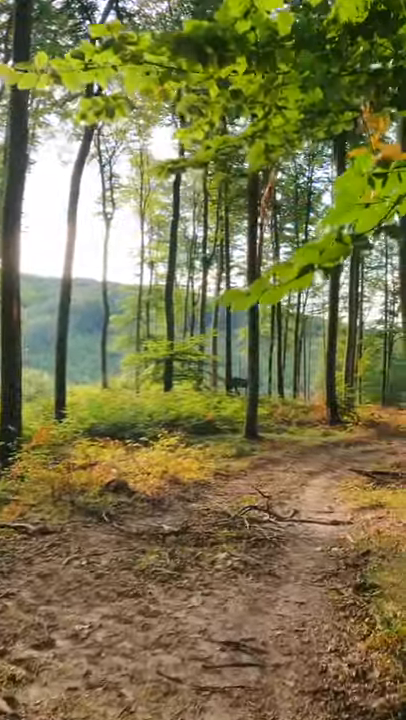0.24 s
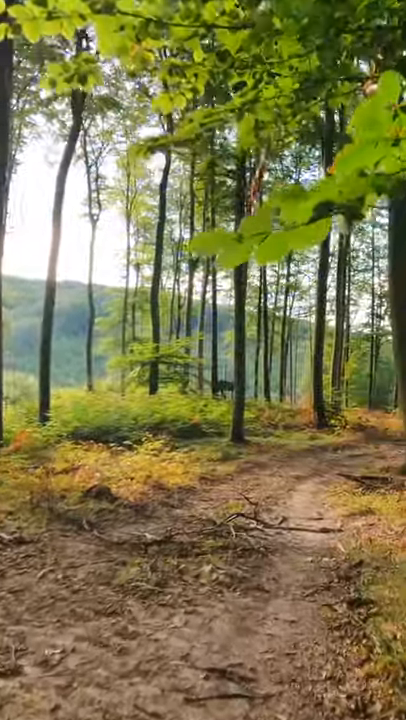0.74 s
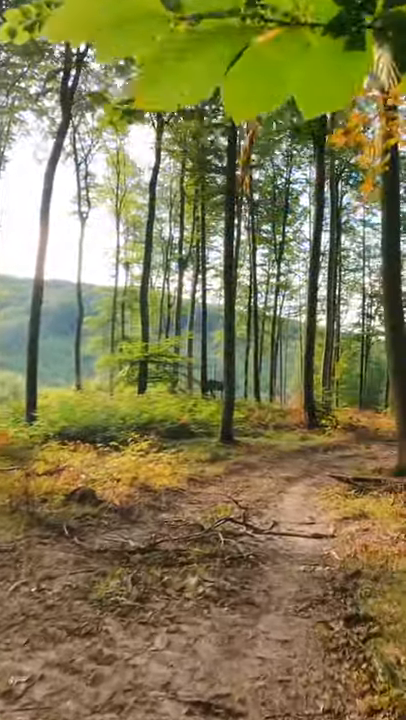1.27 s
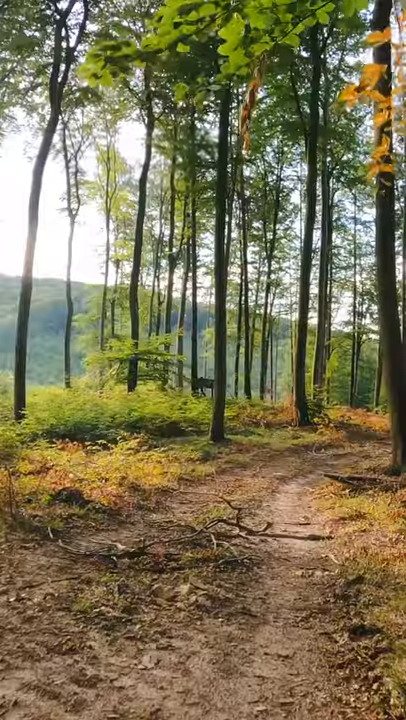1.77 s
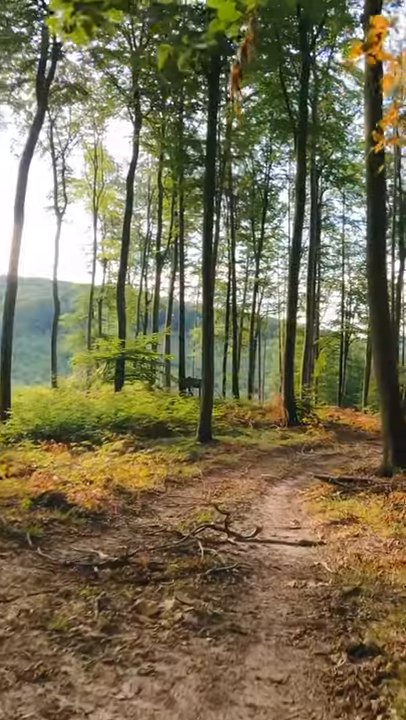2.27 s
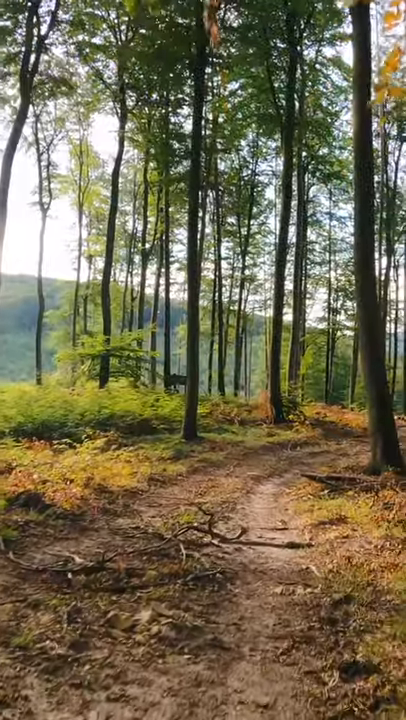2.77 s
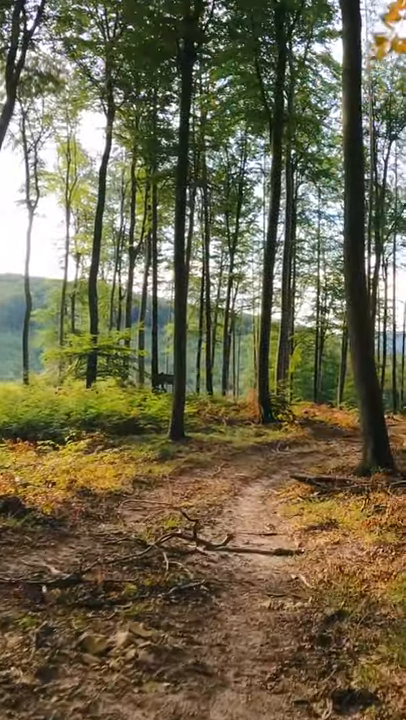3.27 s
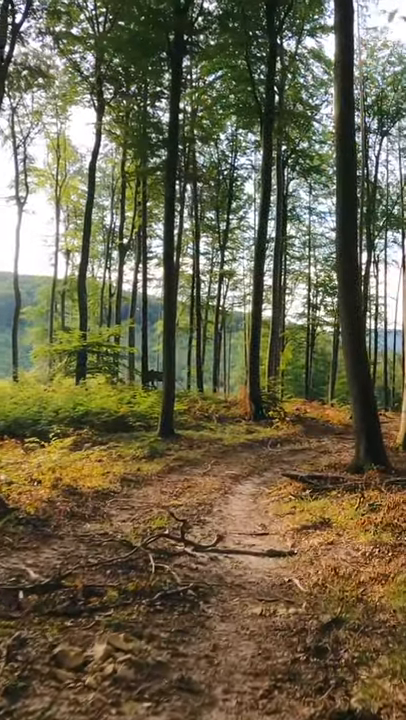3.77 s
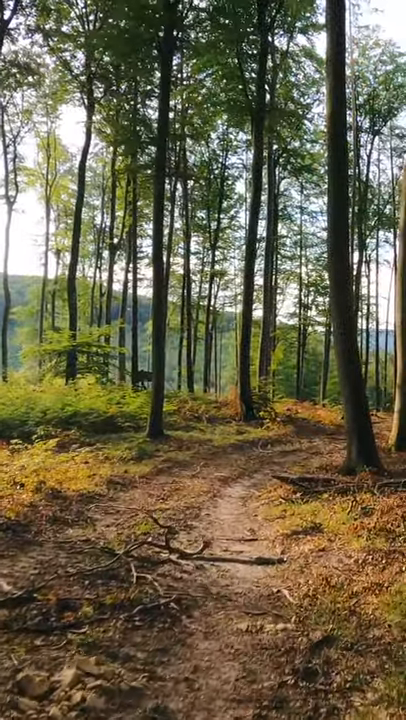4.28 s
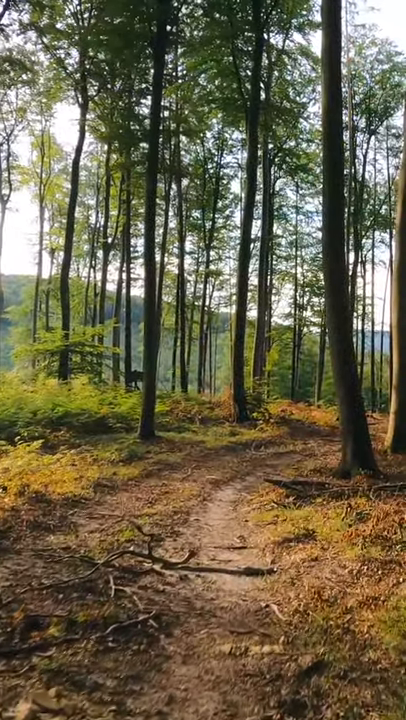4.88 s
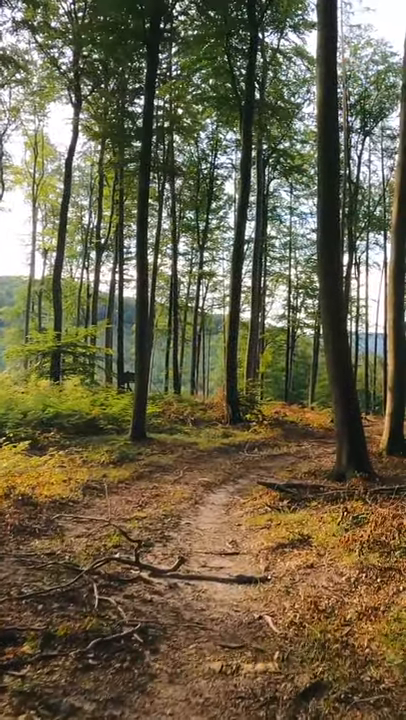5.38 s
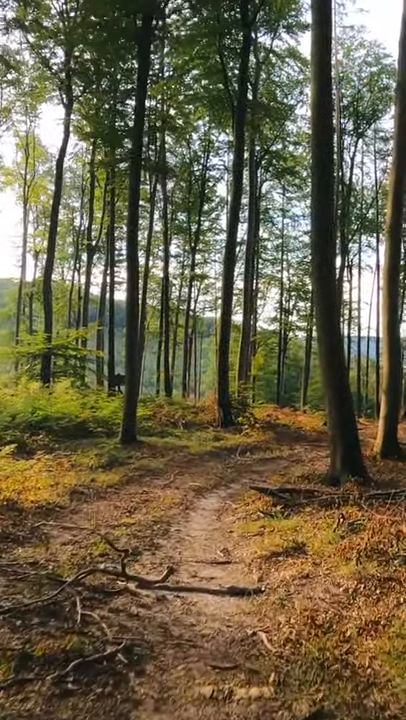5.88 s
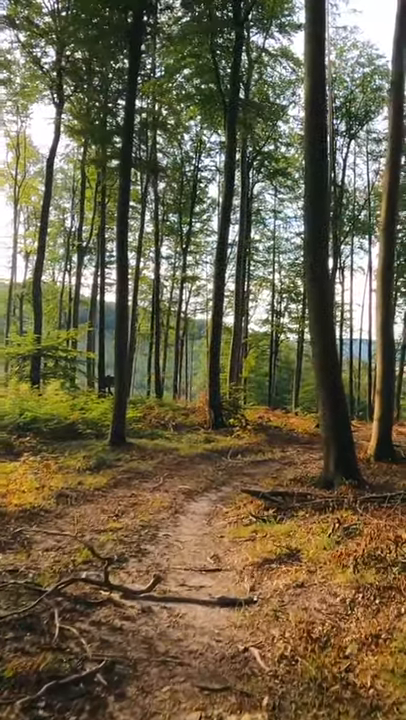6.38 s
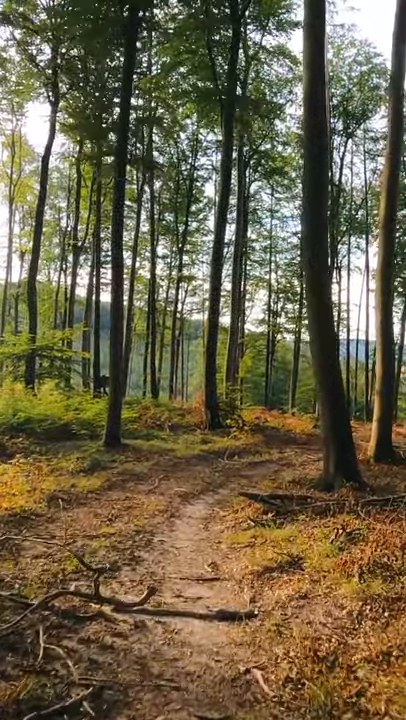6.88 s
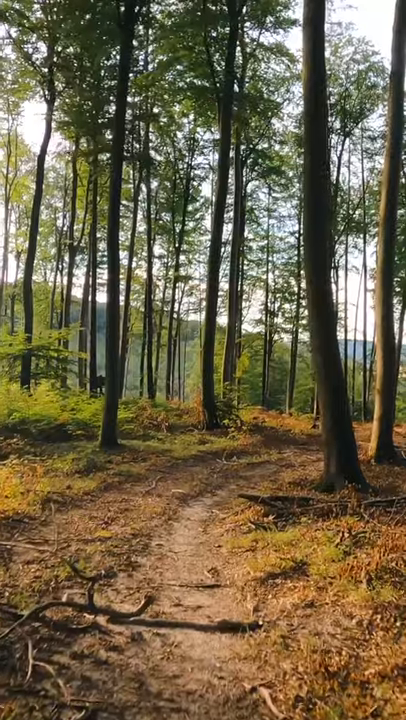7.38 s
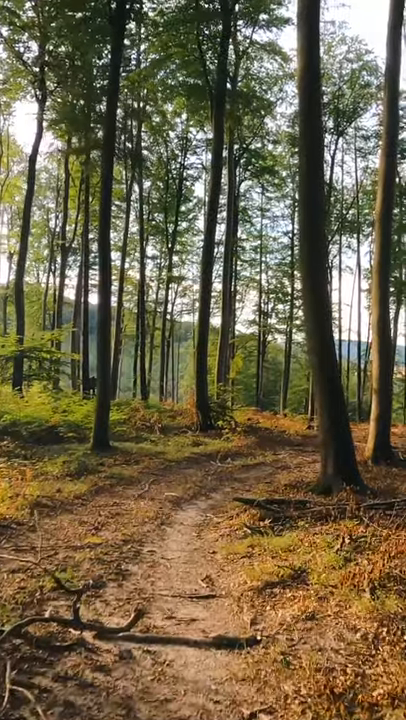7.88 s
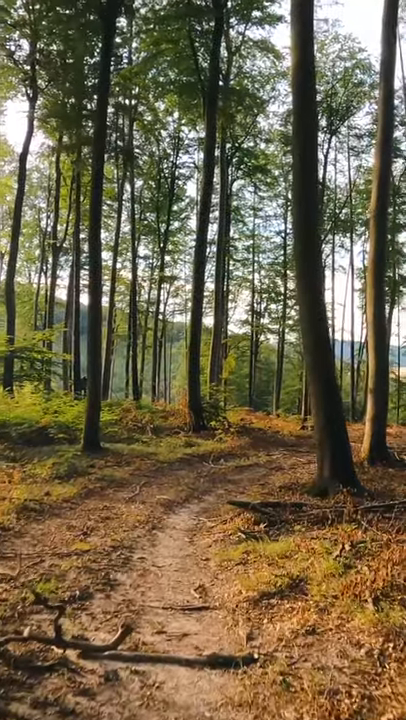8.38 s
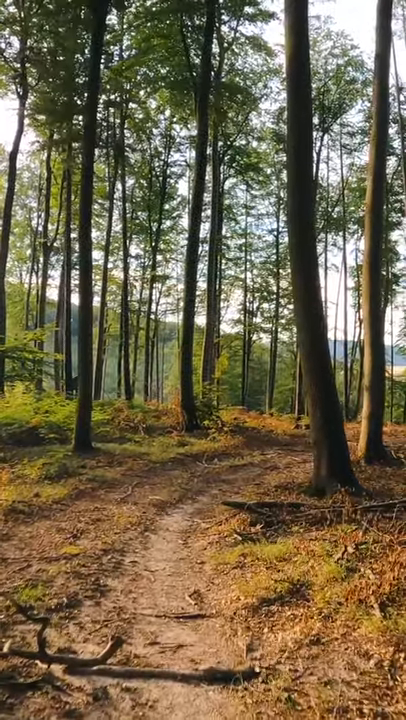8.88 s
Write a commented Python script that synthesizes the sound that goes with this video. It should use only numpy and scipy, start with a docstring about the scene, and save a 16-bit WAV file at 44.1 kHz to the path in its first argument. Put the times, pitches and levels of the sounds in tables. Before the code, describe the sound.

Light wind rumbles on a microphone carried along a forest path, under a steady scatter of birdsong. Fluted whistles, short chirps and fast high trills come first, followed by one bird alternating two notes, then farther calls and a few more whistles at the end. Quiet steps on sticks, stones and dry leaves come now and then, with a faint hush from the treetops.

```python
"""Songbirds in a beech wood.

A blackbird flutes and trills; warblers chirp and one repeats a two-note motif. Notes are gliding sines,
most from one stock of syllables. Farther birds come mostly as echo among the trunks; a wood pigeon coos.
Soft steps on the dirt path knock sticks and stones (noise bursts) and crush leaves (tiny cracks).
Light wind rumbles on the microphone over the hush of the canopy and a blur of distant song."""
import sys
import numpy as np
from scipy import signal
from scipy.fft import rfft, irfft, next_fast_len
from scipy.io import wavfile
from scipy.ndimage import uniform_filter1d, map_coordinates

SR = 44100
rng = np.random.default_rng(int(sys.argv[2]) if len(sys.argv) > 2 else 0)


def wav_out(sig):
    """Save sig, one row per channel (or a flat mono array), as 16-bit PCM at SR to the path in sys.argv[1]."""
    wavfile.write(sys.argv[1], SR, np.round(np.clip(np.atleast_2d(sig).T, -1, 1) * 32767).astype(np.int16))


N = 403074

# shared syllables, by name: start_semitones, end_semitones (from mid pitch), swell_db, slide_semitones
SYLLABLES = {"hold": (0, 0.06, -2.5, 0), "swell": (-0.15, 0.4, 16, 0), "sag": (0.85, -1.1, 2.7, 0),
             "settle": (2, 0.5, 6.5, 0), "fall": (1.6, -2.5, 6.5, 0), "plunge": (8, 1, -13.5, 0),
             "drop": (-0.061, -2.16, 0.96, -0.58), "rise": (-2, 1.26, 2, 0.5), "lift": (-2.5, -0.1, 4, 0),
             "arch": (-0.96, -1.2, 0, 0), "peak": (-3.5, -7, 0, 1.5), "dip": (2.5, 2.5, -1, 0),
             "climb": (-3, 4, 6, -1), "crest": (-.45, -.35, -2, 0.24), "slur": (0.5, 0, 7, 4),
             "flick": (1.3, -0.1, -6, 5), "dive": (3.5, -5, -2.5, 0), "soar": (-2.2, 2.6, 12.5, 1)}
# sung notes: start_s, syllable, length_s, pitch_hz, level_db
BLACKBIRD_WHISTLES = [(.96, "settle", 0.174, 1709, -46.5), (1.48, "arch", 0.046, 1937, -38.5),
                      (1.602, "sag", 0.029, 2307, -39.5), (1.666, "fall", 0.021, 1875, -44),
                      (1.875, "arch", 0.17, 1674, -43), (1.98, "lift", 0.059, 1904, -49),
                      (2.348, "settle", 0.058, 2106, -54.5), (2.478, "sag", 0.092, 2059, -51),
                      (2.575, "sag", 0.058, 1979, -41.5), (2.62, "hold", 0.075, 1890, -48.5),
                      (2.875, "fall", 0.034, 1966, -64.5), (2.95, "rise", 0.062, 2080, -57.5),
                      (8.523, "slur", 0.072, 1620, -55), (8.603, "swell", 0.077, 2200, -48),
                      (8.655, "sag", 0.033, 2146, -54.5), (8.8, "swell", 0.096, 1985, -47),
                      (8.89, "slur", 0.12, 2179, -39)]
BLACKBIRD_CHIRPS = [(1.643, "sag", 0.03, 2330, -33.5), (2.088, "soar", .046, 2635, -34),
                    (3.053, "peak", .039, 2867, -36), (3.107, "peak", 0.039, 2918, -37)]
WARBLER_NOTES = [(0, "hold", 0.032, 3198, -40.5), (.265, "fall", 0.041, 3890, -49),
                 (.358, "fall", 0.025, 3840, -46), (.497, "arch", 0.045, 3270, -45.5),
                 (.668, "settle", 0.022, 3323, -49.5), (.875, "rise", 0.019, 3115, -53),
                 (.897, "hold", 0.047, 3074, -49.5), (.935, "fall", 0.019, 2930, -50.5),
                 (1.317, "crest", 0.12, 3937, -57.5), (1.14, "lift", 0.11, 2850, -48),
                 (1.463, "sag", 0.09, 3275, -45), (1.653, "drop", 0.029, 3120, -42),
                 (1.81, "hold", 0.04, 4210, -52.5), (1.836, "fall", 0.021, 3680, -44.5),
                 (1.853, "crest", 0.066, 3223, -40), (1.848, "rise", 0.037, 2610, -45),
                 (3.265, "sag", 0.098, 3806, -47.5), (3.365, "sag", 0.022, 2920, -47),
                 (3.405, "settle", 0.018, 2550, -45), (3.433, "drop", 0.029, 2623, -42.5),
                 (3.772, "fall", 0.019, 4325, -42), (3.783, "hold", 0.084, 3990, -44),
                 (3.897, "arch", 0.048, 3800, -41), (3.955, "hold", 0.058, 3420, -48),
                 (4, "hold", 0.05, 4010, -57), (4.325, "lift", 0.083, 3207, -54.5),
                 (4.368, "sag", 0.012, 2920, -48.5), (4.56, "lift", 0.05, 2630, -50.5),
                 (4.6, "crest", 0.1, 2750, -43.5), (4.748, "sag", 0.018, 2800, -43),
                 (4.8, "slur", 0.051, 3715, -48), (4.965, "hold", 0.043, 3150, -42.5),
                 (5.352, "hold", 0.021, 3272, -42), (7.545, "hold", .21, 4515, -54.5),
                 (7.58, "hold", .2, 4210, -53), (7.62, "sag", 0.069, 4670, -52.5),
                 (8.22, "hold", 0.11, 2925, -54.5), (8.445, "hold", .06, 3170, -49),
                 (8.6, "slur", 0.12, 3228, -45.5), (8.63, "hold", 0.072, 2776, -52.5)]
TWITTER_NOTES = [(4.964, "climb", 0.013, 4750, -49), (4.979, "dip", .027, 4900, -45),
                 (5.016, "fall", 0.017, 4500, -45), (5.198, "flick", 0.047, 5160, -50.5),
                 (5.366, "flick", .036, 5320, -57)]
CHIP_NOTES = [(1.092, "fall", 0.025, 5050, -58.5), (1.428, "fall", 0.039, 4990, -57.5),
              (3.074, "peak", 0.013, 4600, -52), (3.165, "peak", 0.009, 4720, -56),
              (3.598, "flick", 0.046, 7020, -63), (4.09, "fall", 0.014, 6730, -61.5),
              (4.522, "dive", 0.016, 5060, -54), (4.815, "dive", 0.015, 6430, -61),
              (7.55, "fall", 0.03, 3930, -51)]
TREETOP_NOTES = [(.1, "crest", 0.077, 5100, -67), (3.3, "hold", 0.078, 6630, -73),
                 (3.67, "hold", 0.031, 5130, -62.5), (4.15, "hold", 0.23, 6920, -77.5),
                 (4.42, "arch", 0.069, 8400, -80), (6.015, "crest", 0.071, 6930, -67.5),
                 (6.1, "crest", 0.35, 7340, -75.5), (6.22, "hold", 0.12, 6880, -76.5),
                 (7, "sag", 0.082, 7000, -70.5), (7.1, "crest", 0.22, 7770, -83),
                 (7.3, "sag", 0.14, 8140, -83), (7.49, "plunge", 0.087, 5270, -72.5),
                 (8.03, "fall", 0.073, 6550, -75.5)]
FAR_NOTES = [(0, "fall", 0.047, 3434, -52.5), (1.7, "hold", 0.027, 2695, -41.5),
             (1.8, "hold", 0.048, 4350, -48.5), (2.512, "drop", 0.043, 2824, -56.5),
             (2.77, "lift", 0.025, 3353, -49), (3.72, "rise", 0.046, 3450, -50.5),
             (4.25, "lift", 0.073, 3420, -58.5), (4.44, "rise", 0.035, 3200, -60),
             (4.95, "sag", 0.065, 4210, -57.5), (6.88, "sag", 0.038, 4320, -52),
             (6.91, "hold", 0.1, 3197, -55.5), (7, "sag", 0.11, 3780, -62), (7.12, "sag", 0.099, 4410, -59),
             (7.332, "hold", 0.034, 3480, -46), (7.475, "fall", 0.033, 3190, -50.5),
             (7.535, "hold", 0.085, 4380, -47.5), (7.55, "fall", 0.047, 3520, -49.5),
             (7.74, "hold", 0.11, 2804, -52), (8.04, "hold", 0.11, 3150, -50),
             (8.08, "fall", 0.03, 3490, -49.5), (8.15, "sag", .04, 4360, -60.5),
             (8.28, "fall", 0.033, 3600, -43.5), (8.33, "hold", 0.031, 3300, -50),
             (8.405, "settle", 0.029, 3345, -41.5), (8.51, "fall", .04, 3410, -48),
             (8.63, "hold", 0.078, 2947, -48), (8.8, "sag", 0.038, 4000, -52),
             (8.83, "rise", 0.067, 3506, -46.5), (8.86, "fall", 0.058, 3040, -51),
             (8.9, "sag", 0.077, 2443, -48)]
# warblers shift as the walker turns: time_s, left_minus_right_db
WARBLER_PAN = [(0, 7.5), (1.6, 5), (3.3, 1.5), (5.3, 3.5)]
# the motif's two syllables: offset_s, pitch_hz, level_db
HOOK_CONTOUR = [(0, 3950, -24), (.009, 4150, -13), (.018, 4290, 0), (.029, 4230, -1), (.037, 3700, -1),
                (.045, 3380, -5), (.054, 3260, -16), (.068, 3250, -4), (.098, 3250, -3), (.112, 3240, -18)]
SCOOP_CONTOUR = [(0, 3350, -12), (.005, 3050, 0), (.014, 2750, 0), (.026, 2670, -3), (.038, 2770, -2),
                 (.05, 2880, 0), (.06, 2870, -1), (.068, 2850, -12)]
# their repeats: start_s, level_db, closing_gain_db
HOOK_REPEATS = [(5.262, -40.5, -5), (5.585, -35.5, -3.5), (5.926, -37, -4), (6.266, -38, 3),
                (6.647, -40, 3.5)]
SCOOP_REPEATS = [(5.121, -39, 0.49), (5.454, -42, 2.4), (5.78, -39.5, 1), (6.124, -38.5, 1.5),
                 (6.485, -40, 1.2)]
# trills: start_s, length_s, start_hz, mid_hz, end_hz, level_db, swell_db, sweeps_per_s, depth_hz
TRILLS = [(1.267, 0.059, 1528, 1716, 1855, -43, 11.5, 72, 133),
          (1.315, .16, 1980, 2282, 2056, -41, -0.5, 39.8, 402),
          (2.721, .016, 4500, 4370, 4200, -53.5, 0, 166, 450),
          (2.758, 0.038, 5680, 6050, 5670, -43, 17.5, 56, 890),
          (2.814, 0.033, 5580, 5140, 5180, -40, -10, 112, 643),
          (2.909, 0.039, 6400, 6450, 5660, -48, 27, 52, 760),
          (2.96, 0.036, 5460, 5410, 5370, -41.5, -13, 147, 606),
          (3.324, 0.094, 4034, 4027, 3964, -47.5, -5, 87, 424),
          (4.141, 0.101, 2640, 2902, 2720, -45.5, 9, 170, 127.6),
          (4.904, 0.049, 5800, 5395, 5280, -47, 4, 310, 152),
          (5.092, 0.039, 4380, 4130, 4600, -46.5, 0.5, 82, 270),
          (5.149, 0.018, 4570, 4520, 4300, -49.5, 5.5, 80, 350),
          (5.269, 0.041, 4400, 4440, 4730, -40, -9, 300, 172)]
# coos of the pigeon's phrase: offset_s, length_s, start_hz, mid_hz, end_hz, level_db
COO_NOTES = [(0, 0.065, 428, 460, 567, -73.5), (0.521, 0.39, 562.5, 502.6, 401, -69),
             (1.242, 0.055, 406, 438, 532, -71.5), (1.36, 0.17, 538, 457.5, 382, -67.5),
             (1.632, .25, 457, 431, 380, -64), (2.268, 0.11, 492, 531, 577, -75.5)]
# its repeats: start_s, gain_db, growth_db_per_s
COO_REPEATS = [(.07, -6, 2.5), (2.74, -3, -5), (5.45, -1.5, -1), (8.18, -2, -6)]
# sticks and stones giving underfoot: start_s, level_db, thud_gain_db, snap_gain_db
STEPS = [(0.38, -48.5, -3.5, -20), (0.943, -46, -15, -45), (1.057, -71, -8, 0.5), (1.475, -43.5, -16, -36),
         (1.493, -45.5, -2.5, -45.5), (1.847, -48, -13, -30), (1.867, -37, -23, -34.5),
         (1.875, -40.5, -23, -36), (1.909, -43.5, -19, -30), (1.965, -46, -23, -36),
         (2.01, -47, -22, -37.5), (3.02, -47, -1, -30), (3.118, -43, -4, -25), (3.601, -46, -10, -34),
         (3.614, -49.5, -6, -34), (5.744, -44.5, -20, -28.5), (6.72, -48.5, -25, -32),
         (6.765, -43.5, -19, -46), (6.778, -59, -13, -44), (6.792, -39.5, -30, -55), (6.81, -67, -10, -45),
         (7.269, -45, -8, -41), (7.664, -51, -11.5, -51), (7.85, -49, 5.5, -51), (7.869, -53, -5, -49),
         (8.402, -48, -3, -33)]
# dry leaves crushed: start_s, length_s, level_db
CRUNCHES = [(0.358, 0.15, -80), (1.284, 0.22, -85), (1.44, 0.074, -82), (1.621, .05, -77),
            (1.842, 0.084, -73), (3.64, 0.09, -78.5), (3.76, .03, -71.5), (3.963, .11, -73.5),
            (5.955, 0.078, -75), (7.305, 0.089, -83), (7.975, .03, -74.5), (8.255, 0.15, -80)]
# footstep spectra: freq_hz, gain_db
SCUFF_SPECTRUM = [(200, -26), (500, -7), (800, -6.5), (1300, -3.5), (1800, -6), (2500, -14.5), (5000, -19),
                  (9000, -57.5)]
THUD_SPECTRUM = [(40, -17.5), (170, 4), (320, 0.5), (600, -6), (1500, -63.5)]
SNAP_SPECTRUM = [(800, -12.5), (3000, -1.5), (7000, 5.5), (11500, -21), (13000, -23.5)]
LEAF_SPECTRUM = [(1500, -13), (4000, 5), (7500, 10), (9500, -4), (11800, -13), (13000, -34)]
# background envelopes: time_s, level_db
WIND_LEVEL = [(0.0, -51.5), (0.1, -58.5), (0.41, -43.5), (0.46, -57.5), (1.78, -53), (1.86, -67),
              (2.16, -55.5), (2.24, -70), (2.34, -50), (2.52, -63), (2.82, -51), (2.87, -64), (3.05, -50),
              (3.16, -64), (3.31, -41.5), (3.36, -55), (3.71, -62.5), (3.74, -56.5), (5.55, -57.5),
              (5.58, -50.5), (5.96, -57), (6.34, -52.5), (6.39, -41.5), (6.46, -56.5), (6.72, -48),
              (7.13, -61), (7.25, -54), (7.84, -58.5), (7.89, -65), (8.47, -52.5), (8.81, -64), (9.14, -50)]
CHORUS_LEVEL = [(0.0, -53.5), (0.94, -96), (1.42, -61.5), (2.04, -54), (2.52, -75), (3.33, -55.5),
                (3.64, -57.5), (3.97, -54), (4.58, -79), (4.81, -45), (5.5, -44.5), (6.59, -50.5),
                (7.28, -57), (7.64, -51), (8.02, -68), (8.35, -47.5), (8.73, -73), (9.14, -57)]
HIGH_TWITTER_LEVEL = [(0.0, -88.5), (4.4, -83.5), (5.09, -89), (5.98, -82.5), (6.19, -90), (6.49, -87.5),
                      (7.36, -83), (7.61, -98), (8.53, -82), (9.14, -92.5)]
# background spectra: freq_hz, gain_db
RUMBLE_SPECTRUM = [(15, -7.5), (30, -4.5), (62, 6.5), (90, -4), (130, -11.5), (220, -38.5), (400, -48.5),
                   (900, -81.5)]
EDDY_SPECTRUM = [(15, 8), (30, 1.5), (60, -17), (120, -25), (300, -67.5)]
CANOPY_SPECTRUM = [(100, 1.5), (200, -0.5), (330, -6.5), (700, -11), (1050, -5), (1500, -8.5),
                   (2200, -10.5), (4000, -17), (6000, -23.5), (8000, -33), (10000, -47), (11800, -52),
                   (12500, -50.5)]
CHORUS_SPECTRUM = [(2200, -31), (2650, 0.5), (3150, 6.5), (4200, -5.5), (4800, -11.5), (6000, -54)]
HIGH_TWITTER_SPECTRUM = [(4500, -15), (6000, -5.5), (7300, 0.5), (8200, -8), (9500, -20.5), (12000, -38.5)]
# echo decay of the far trunks: freq_hz, t60_s
FOREST_T60 = [(300, .7), (1700, .56), (2400, .7), (3200, .88), (5000, .85), (8000, .65)]


def blackbird(pan_db=-1.5):
    """Fluted whistles and loud, soft-edged closing chirps."""
    whistles = pan(sing(BLACKBIRD_WHISTLES, taper=0.21, waver=0.005, waver_per_s=200), pan_db)
    chirps = pan(sing(BLACKBIRD_CHIRPS, taper=0.61, waver=0.0067, waver_per_s=180), pan_db)
    return (forest(whistles, direct_db=3, echo_db=1.3, lag_us=62, side_db=-8.5, bloom_s=0.021)
            + forest(chirps, direct_db=0.5, echo_db=-3.5, lag_us=65, side_db=-7, bloom_s=0.0082))


def warblers():
    """Short chirps, and one bird alternating two syllables."""
    chirps = sing(WARBLER_NOTES, taper=0.15, waver=0.0094, waver_per_s=209)
    chirps = pan(chirps, over_time(WARBLER_PAN))
    motif = repeat_syllable(HOOK_CONTOUR, HOOK_REPEATS) + repeat_syllable(SCOOP_CONTOUR, SCOOP_REPEATS)
    motif = pan(motif, pan_db=3)
    return (forest(chirps, direct_db=0.5, echo_db=-2.5, lag_us=52, side_db=-2.5, bloom_s=0.019)
            + forest(motif, direct_db=-0.96, echo_db=-5, lag_us=32, side_db=-6, bloom_s=0.02))


def sing(notes, taper, waver, waver_per_s, slide_share=0.13):
    """Stock syllables, each stretched to its length and moved to its pitch."""
    song = np.zeros(N)
    for start_s, syllable, length_s, pitch_hz, level_db in notes:
        start_semitones, end_semitones, swell_db, slide_semitones = SYLLABLES[syllable]
        semitones = arc(length_s, start_semitones, 0, end_semitones)
        semitones -= slide_semitones * np.exp(-np.linspace(0, 1, len(semitones)) / slide_share)
        note = whistle(pitch_hz * 2 ** (semitones / 12), swell_db, taper, waver, waver_per_s)
        add(song, start_s, amp(level_db) * note)
    return song


def whistle(pitch_hz, swell_db, taper, waver, waver_per_s, attack_s=0.0024, flutter_db=1.5):
    """One unsteady note of rms 1; waver is a fraction of the pitch."""
    n = len(pitch_hz)
    envelope = signal.windows.tukey(n, taper) * (1 - np.exp(-np.arange(n) / SR / attack_s))
    level_db = swell_db * np.linspace(-0.5, 0.5, n) + flutter_db * wobble(waver_per_s, n)
    unsteady_hz = pitch_hz * (1 + waver * wobble(waver_per_s, n))
    return unit_rms(envelope * amp(level_db) * tone(unsteady_hz))


def repeat_syllable(contour, repeats):
    """A learnt syllable, slightly detuned each time, its close stronger or weaker."""
    song = np.zeros(N)
    offset_s, contour_hz, contour_db = np.transpose(contour)
    t = np.arange(int(offset_s[-1] * SR)) / SR
    pitch_hz = uniform_filter1d(np.interp(t, offset_s, contour_hz), size=300)
    envelope = np.sqrt(2) * amp(np.interp(t, offset_s, contour_db)) * signal.windows.tukey(len(t), 0.1)
    closing = np.interp(t / offset_s[-1], [0.45, 0.55], [0, 1])
    for start_s, level_db, closing_db in repeats:
        detune = 1 + 0.0039 * rng.standard_normal()
        add(song, start_s, amp(level_db + closing_db * closing) * envelope * tone(pitch_hz * detune))
    return song


def trills(uneven_rad=0.25, accent_db=4, top_loss_db=2):
    """Fast pitch sweeps, loudest on the rise, with a faint octave above."""
    song = np.zeros(N)
    for start_s, length_s, start_hz, mid_hz, end_hz, level_db, swell_db, sweeps_per_s, depth_hz in TRILLS:
        centre_hz = arc(length_s, start_hz, mid_hz, end_hz)
        n = len(centre_hz)
        phase = 2 * np.pi * sweeps_per_s * np.arange(n) / SR + uneven_rad * wobble(sweeps_per_s, n)
        height = np.abs((1 + signal.sawtooth(phase, 0.54)) / 2) ** 1.6  # round troughs, pointed peaks
        pulse = amp(accent_db * np.sin(phase) - top_loss_db * height)
        pitch_hz = centre_hz + depth_hz * (2.2 * height - 1)
        sweeps = whistle(pitch_hz, swell_db, taper=0.28, waver=0.008, waver_per_s=400)
        sweeps *= 1 + amp(-32) * tone(pitch_hz)  # adds the octave
        add(song, start_s, amp(level_db) * unit_rms(pulse * sweeps))
    return forest(song, direct_db=0.47, echo_db=-2, lag_us=50, side_db=-6.5, bloom_s=0.007)


def small_birds():
    """A quick twitter, sharp falling chips and thin notes from the treetops."""
    twitter = sing(TWITTER_NOTES, taper=0.15, waver=0.004, waver_per_s=220)
    chips = sing(CHIP_NOTES, taper=0.3, waver=0.026, waver_per_s=680)
    treetops = sing(TREETOP_NOTES, taper=0.7, waver=0.011, waver_per_s=110)
    return (forest(twitter, direct_db=-1.5, echo_db=-9.5, lag_us=35, side_db=-2, bloom_s=0.014)
            + forest(chips, direct_db=0, echo_db=5.5, lag_us=39, side_db=-1, bloom_s=0.0083)
            + forest(treetops, direct_db=-1, echo_db=4.5, lag_us=45, side_db=-10, bloom_s=0.0068))


def far_birds(chatter_count=18, chatter_hz=3575, chatter_s=0.041, chatter_db=-64):
    """Birds deep in the wood and faint random chatter: blurred in pitch, mostly echo."""
    names = list(SYLLABLES)
    chatter = []
    for when, which, stretch, height in rng.random((chatter_count, 4)):
        syllable = names[int(which * len(names))]
        pitch_hz = chatter_hz * np.exp(0.14 * (2 * height - 1))
        chatter.append((when * N / SR, syllable, chatter_s * (0.5 + stretch), pitch_hz, chatter_db))
    song = sing(FAR_NOTES + chatter, taper=0.091, waver=0.028, waver_per_s=400)
    return forest(song, direct_db=-11, echo_db=3, lag_us=66, side_db=-11, bloom_s=0.025)


def pigeon():
    """One low phrase, repeated; a strong pitch waver makes it husky."""
    song = np.zeros(N)
    for start_s, gain_db, growth_db_per_s in COO_REPEATS:
        for offset_s, length_s, start_hz, mid_hz, end_hz, level_db in COO_NOTES:
            pitch_hz = arc(length_s, start_hz, mid_hz, end_hz)
            coo = whistle(pitch_hz, swell_db=8.5, taper=0.34, waver=0.047, waver_per_s=130)
            add(song, start_s + offset_s, amp(level_db + gain_db + growth_db_per_s * offset_s) * coo)
    return forest(song, direct_db=4.5, echo_db=5.5, lag_us=77, side_db=-9.5, bloom_s=0.0093)


def footsteps(attack_s=0.003, grit_db=-16.5):
    """Sticks and stones give under soft soles: a knock with trickling grit, a thud, a twig snap."""
    scuff, thud, snap = np.zeros((3, N))
    t = np.arange(SR // 4) / SR

    def burst(t60_s):
        return amp(-60 * t / t60_s) * (1 - np.exp(-t / attack_s))

    for start_s, level_db, thud_db, snap_db in STEPS:
        jerks = unit_rms(amp(6 * wobble(400, len(t))))  # the ground settles unevenly
        grit = amp(grit_db) * jerks * burst(t60_s=0.14)
        add(scuff, start_s, amp(level_db + 4.5) * (burst(t60_s=0.017) + grit))
        add(thud, start_s, amp(level_db + thud_db + 6.5) * burst(t60_s=0.03))
        add(snap, start_s, amp(level_db + snap_db + 13.5) * burst(t60_s=0.033))
    layers = (scuff, SCUFF_SPECTRUM), (thud, THUD_SPECTRUM), (snap, SNAP_SPECTRUM)
    return sum(envelope * noise(spectrum, side_db=-13, patchy_db=1.5) for envelope, spectrum in layers)


def leaves(cracks_per_s=5000, spread_db=3, surge_db=3, surges_per_s=70):
    """Leaf litter crumples in a dense, surging shower of tiny cracks."""
    crunches = np.zeros((2, N))
    for start_s, length_s, level_db in CRUNCHES:
        n = int(length_s * SR)
        cracks = (rng.random(n) < cracks_per_s / SR) * rng.standard_normal((2, n))
        cracks *= amp(spread_db * rng.standard_normal(n))
        surge = amp(surge_db * wobble(surges_per_s, n)) * signal.windows.tukey(n, 0.5)
        add(crunches, start_s, amp(level_db + 4.5) * unit_rms(cracks * surge))
    return filtered(crunches, lambda hz: amp(over_freq(LEAF_SPECTRUM, hz)))


def wind(buffet_db=2.06, buffets_per_s=14):
    """Wind buffets the microphone: a shared rumble plus each port's own eddies."""
    rumble = noise(RUMBLE_SPECTRUM, side_db=-13, patchy_db=1)
    eddies = amp(-4) * noise(EDDY_SPECTRUM, side_db=0, patchy_db=1)
    level_db = over_time(WIND_LEVEL) + 0.5 + buffet_db * wobble(buffets_per_s, N)
    return pan(amp(level_db) * (rumble + eddies), pan_db=1)


def chorus():
    """Countless distant birds blur into two bands of noise."""
    song = noise(CHORUS_SPECTRUM, side_db=-3.5, patchy_db=7.5)
    twitter = noise(HIGH_TWITTER_SPECTRUM, side_db=4, patchy_db=-0.5)
    return amp(over_time(CHORUS_LEVEL) - 6) * song + amp(over_time(HIGH_TWITTER_LEVEL) + 4.5) * twitter


def canopy():
    """Broad hush of the treetops."""
    return amp(-63) * noise(CANOPY_SPECTRUM, side_db=-7, patchy_db=4)


def forest(voice, direct_db, echo_db, lag_us, side_db, bloom_s):
    """Direct sound plus trunk echo whose paths change as the microphone moves; left lags right."""
    voice = voice * np.ones((2, 1))
    echo = np.zeros((2, N))
    mono, hop = voice.mean(0), SR // 2
    for centre in range(0, N, hop):
        is_last = centre + hop >= N
        crossfade = np.interp(np.arange(N), [centre - hop, centre, centre + hop], [0, 1, float(is_last)])
        first = max(0, centre - hop)
        segment = (mono * crossfade)[None, first:centre + hop]
        add(echo, first / SR, signal.fftconvolve(segment, trunk_response(side_db, bloom_s), axes=1))
    mix = amp(direct_db) * voice + amp(echo_db) * echo
    delay_s = np.array([[0.5], [-0.5]]) * lag_us / 1e6
    return filtered(mix, lambda hz: np.exp(-2j * np.pi * hz * delay_s))


def trunk_response(side_db, bloom_s, near_t60_s=0.13):
    """Far and near trunks scatter an impulse into a tail that builds over bloom_s."""
    hz, t, spectra = signal.stft(rng.standard_normal((2, SR)), SR, nperseg=256)
    decay = amp(-60 * t / over_freq(FOREST_T60, hz)[:, None]) + 3.8 * amp(-60 * t / near_t60_s)
    single_trunks = amp(3 * rng.standard_normal(len(t)))
    build_up = 1 - np.exp(-t / bloom_s)
    mid, side = signal.istft(spectra * decay * single_trunks * build_up, SR, nperseg=256)[1]
    return unit_stereo(mid, side, side_db) / np.sqrt(len(mid))


def noise(spectrum, side_db, patchy_db):
    """Stereo noise of rms 1, its gain patchy in time and frequency."""
    spectra = signal.stft(rng.standard_normal((2, N)), nperseg=512)[2]
    patches = uniform_filter1d(rng.standard_normal(spectra.shape[1:]), size=5, axis=0)
    patches = unit_rms(uniform_filter1d(patches, size=22, axis=1))
    pair = signal.istft(spectra * amp(patchy_db * patches), nperseg=512)[1][:, :N]
    mid, side = filtered(pair, lambda hz: amp(over_freq(spectrum, hz)))
    return unit_stereo(mid, side, side_db)


def amp(db):
    return 10 ** (np.asarray(db) / 20)


def unit_rms(x):
    return x / np.sqrt(np.mean(x ** 2) + 1e-20)


def unit_stereo(mid, side, side_db):
    return unit_rms(np.array([mid + amp(side_db) * side, mid - amp(side_db) * side]))


def pan(x, pan_db):
    """Positive is left."""
    return x * amp(np.array([[0.5], [-0.5]]) * pan_db)


def tone(pitch_hz):
    return np.sin(2 * np.pi * np.cumsum(pitch_hz) / SR)


def arc(length_s, start, middle, end):
    """Parabola through three values."""
    parabola = np.polyfit([0, 0.5, 1], [start, middle, end], 2)
    return np.polyval(parabola, np.linspace(0, 1, int(length_s * SR)))


def wobble(knots_per_s, n):
    """Smooth random curve."""
    knots = rng.standard_normal(int(n * knots_per_s / SR) + 4)
    return map_coordinates(knots, [np.arange(n) * knots_per_s / SR])


def over_freq(points, hz):
    freq_hz, values = np.transpose(points)
    return np.interp(np.log(hz + 1), np.log(freq_hz + 1), values)


def over_time(points):
    time_s, values = np.transpose(points)
    return np.interp(np.arange(N) / SR, time_s, values)


def filtered(x, response):
    size = next_fast_len(N + 8192)
    return irfft(rfft(x, size) * response(np.fft.rfftfreq(size, 1 / SR)), size)[..., :N]


def add(track, start_s, sound):
    part = track[..., max(0, round(start_s * SR)):][..., :sound.shape[-1]]
    part += sound[..., :part.shape[-1]]


def scene():
    birds = blackbird() + warblers() + trills() + small_birds() + far_birds() + pigeon()
    return birds + footsteps() + leaves() + wind() + chorus() + canopy()


def record(dry):
    """Brick-wall low-pass at 12 kHz."""
    return filtered(dry, lambda hz: hz < 12000)


dry = scene()
out = record(dry)
wav_out(out)
```